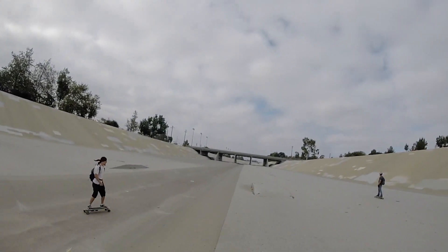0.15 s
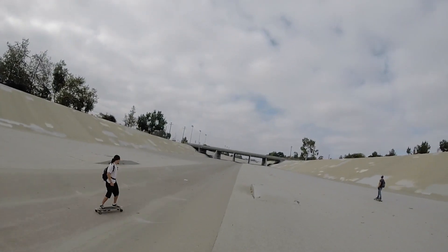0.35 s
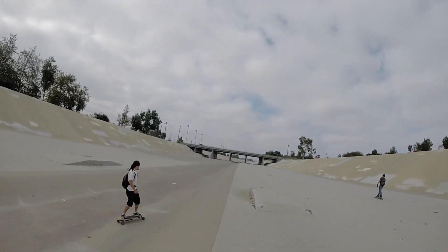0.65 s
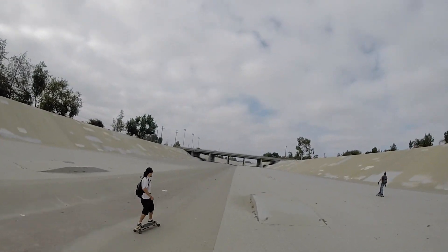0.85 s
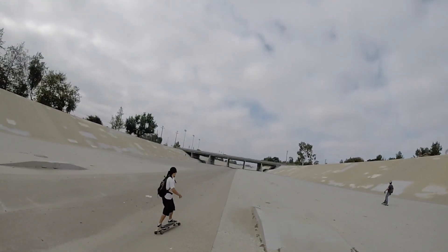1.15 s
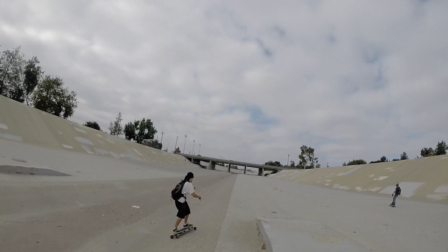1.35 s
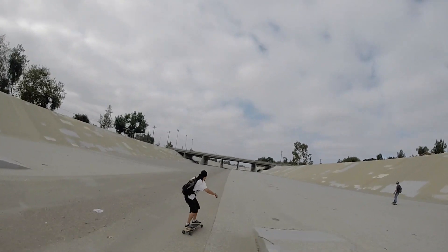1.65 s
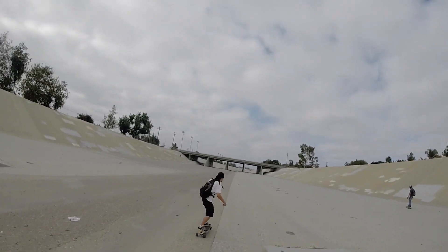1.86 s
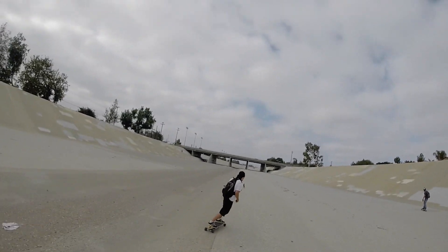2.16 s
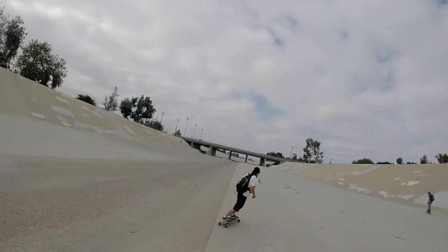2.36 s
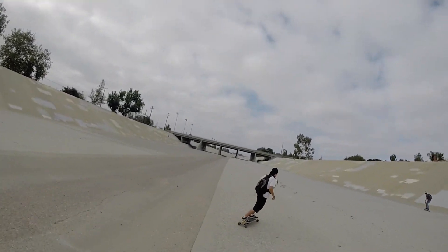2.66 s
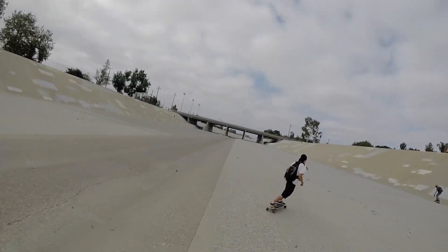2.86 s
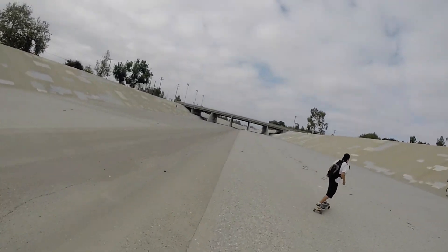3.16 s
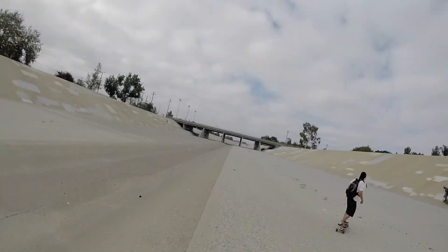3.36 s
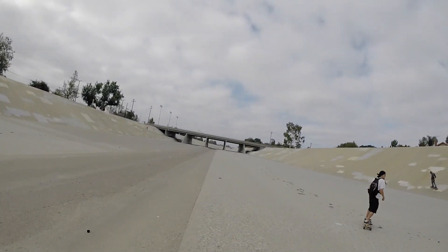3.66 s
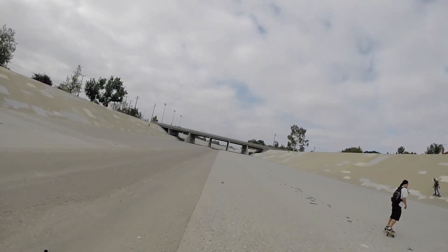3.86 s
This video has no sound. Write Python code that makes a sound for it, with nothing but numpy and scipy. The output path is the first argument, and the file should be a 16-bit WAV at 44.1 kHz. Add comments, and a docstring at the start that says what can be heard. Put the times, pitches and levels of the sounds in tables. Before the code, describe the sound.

Skateboard wheels roll continuously over concrete in an open channel, heard close from a moving board. Until about 2 seconds there is a smooth roar with a low, wavering hum and wind buffeting. Around 2.05 seconds the wheels clack onto harsher ground, with rattle and sandy sizzle. Heavy thumps follow, strongest near 2.7-2.8 seconds, then a faint thin hiss around 3 seconds, and lighter knocks to the end.

```python
"""On the floor of a concrete channel, skateboards roll along, heard from a camera carried on one of them.
Rough ground keeps the camera mount humming (narrow noise) and jolts swing it into dying sine thumps.
Noise impulses ring resonators for decks, trucks and scrape over a smooth roar; decaying bursts clack and tick.
Halfway the boards cross onto a harsher slab and sizzle over sand, then a thin resonant hiss rises in the turn.
Low shaped noise is the wind buffeting the microphone."""
import sys
import numpy as np
from scipy import signal
from scipy.fft import rfft, irfft
from scipy.io import wavfile
from scipy.ndimage import uniform_filter1d

SR = 44100
rng = np.random.default_rng(int(sys.argv[2]) if len(sys.argv) > 2 else 0)


def digitize_waveform(pressure):
    """Quantize a signal to 16-bit integers and store it at the path in sys.argv[1].

    Rows of a 2-D input are taken as channels; values are limited to [-1, 1].
    """
    field = np.atleast_2d(pressure).T
    bounded = np.clip(field, -1, 1)
    quanta = np.round(bounded * 32767).astype(np.int16)
    wavfile.write(sys.argv[1], SR, quanta)


N = 176400
TIME = np.arange(N) / SR

# Resonances of the gritty scrape, rung by rolling and by loose grit.
# Each row: centre in Hz, width in Hz, relative level in dB.
SCRAPE_MODES = [(4370, 190, -2), (4913, 320, 3.5), (5500, 480, 3), (6700, 350, -7.5), (7320, 200, -11)]


def from_db(db):
    """Decibels to amplitude gain."""
    return 10 ** (np.asarray(db) / 20)


def rms_one(x):
    """Scale to unit power."""
    return x / np.sqrt(np.mean(x ** 2) + 1e-20)


def gain_curve(rows, axis=1):
    """Fade between dB points over time, returned as a gain per sample."""
    rows = np.array(rows)
    return from_db(np.interp(TIME, rows[:, 0], rows[:, axis]))


def coloured(points):
    """Unit-power noise whose spectrum follows dB points joined along log frequency."""
    hz, db = np.transpose(points)
    bins = np.maximum(np.arange(N // 2 + 1) * SR / N, 1)
    colour = from_db(np.interp(np.log(bins), np.log(hz), db))
    return rms_one(irfft(rfft(rng.standard_normal(N)) * colour, N))


def drift(rate_hz):
    """Random wander of unit power: noise through two equal low-pass poles."""
    r = np.exp(-2 * np.pi * rate_hz / SR)
    wander = signal.lfilter([1], [1, -2 * r, r * r], rng.standard_normal(N + SR))
    return rms_one(wander[SR:])  # the filter settles during the first second


def resonate(x, hz, width_hz):
    """A steep-sided resonance that keeps the power of white noise."""
    edges = np.clip([hz - width_hz / 2, hz + width_hz / 2], 10, .45 * SR)
    band = signal.butter(2, edges, "band", fs=SR, output="sos")
    return signal.sosfilt(band, x + 1e-18) * np.sqrt(SR / 2 / width_hz)


def body(x, modes):
    """Ring parallel two-pole resonances, then cut steeply outside their range."""
    out = 0
    for hz, width_hz, db in modes:
        r = np.exp(-np.pi * width_hz / SR)
        poles = [1, -2 * r * np.cos(2 * np.pi * hz / SR), r * r]
        ring = signal.lfilter([1, 0, -1], poles, x + 1e-18)
        out = out + from_db(db) * np.sqrt((1 - r * r) / 2) * ring
    lowest_hz, lowest_width_hz, _ = modes[0]
    highest_hz = modes[-1][0]
    edges = np.clip([lowest_hz * .85 - lowest_width_hz / 2, highest_hz * 0.98], 10, .45 * SR)
    out = signal.sosfilt(signal.butter(4, edges, "band", fs=SR, output="sos"), out)
    return out / np.sqrt(sum(from_db(db) ** 2 for _, _, db in modes))


def grains(per_s, spread_db):
    """Tiny random impacts of the wheels on the concrete's grain, at unit power."""
    sizes = from_db(spread_db * np.minimum(rng.exponential(1, N), 6))
    signs = rng.choice([-1, 1], N)
    hits = rng.random(N) < per_s / SR
    return rms_one(sizes * signs * hits)


def bursts(rows, decay_s):
    """Each contact starts a crunch of noise that dies exponentially."""
    level = 0
    for start_s, db in rows:
        fade = np.exp(-np.minimum(np.abs(TIME - start_s) / decay_s, 20))
        level = level + from_db(db) * (TIME >= start_s) * fade
    return level * rng.standard_normal(N)


def swell(at_s, spread_s):
    """A bell-shaped rise and fall."""
    return np.exp(-.5 * ((TIME - at_s) / spread_s) ** 2)


def mount_rumble():
    """The ground keeps the camera mount humming at its resonance, with a fairly even swing."""
    # Shaking of the camera mount. Each row: time in seconds, relative level in dB.
    shake = [(0, -26), (.2, -26), (.36, -36.5), (.45, -24.5), (.53, -21.5), (.6, -39), (.8, -29),
             (1.0, -32.5), (1.28, -24), (1.45, -35), (1.7, -24), (1.93, -29), (2.1, -26), (2.38, -29),
             (2.75, -24), (3.1, -30.5), (3.4, -27.5), (3.75, -25), (4, -24.5)]
    hum = resonate(rng.standard_normal(N + SR), hz=76.3, width_hz=23.4)
    # dividing by the running level evens out the swing
    hum = hum / np.sqrt(uniform_filter1d(hum ** 2, size=4000) + 1e-3)
    return from_db(-0.5) * gain_curve(shake) * hum[SR:]


def wheels():
    """Grain and joints ring deck, trucks and scrape, juddering together over a smooth roar."""
    # Rolling effort. Each row: time in seconds, deck drone in relative dB, truck rattle in relative dB.
    rolling = [(0.0, -39.5, -52), (0.84, -42.5, -59), (1.83, -39, -49), (2.06, -33.5, -43),
               (2.14, -39, -44.5), (2.18, -32.5, -40.5), (2.39, -39.5, -47), (2.56, -36, -43.5),
               (2.59, -39.5, -48), (2.91, -36, -41.5), (2.94, -39, -44.5), (3.09, -38, -48.5),
               (3.29, -41.5, -49), (3.39, -36, -44), (3.48, -39.5, -47), (3.57, -36, -44.5),
               (3.71, -37, -43.5), (3.98, -37.5, -46.5)]
    # Harshness of the surface under the wheels. Each row: time in seconds, relative level in dB.
    harshness = [(0, -64), (1.3, -70.5), (1.7, -61), (2.08, -56), (2.4, -58.5), (2.7, -56.5), (2.92, -55.5),
                 (3.2, -57.5), (3.55, -57.5), (3.97, -59.5)]
    # Wheels clack over joints. Each row: start in seconds, relative level in dB.
    clack_hits = [(2.040, -29.5), (2.076, -32), (2.21, -41), (2.512, -46), (2.66, -36.5), (2.757, -31),
                  (2.857, -36.5), (2.879, -28), (2.91, -40), (3.69, -39.5), (3.728, -35)]
    # Short scuffs of a wheel on the slab. Each row: start in seconds, relative level in dB.
    scuff_hits = [(2.665, -50), (2.752, -45), (2.81, -54), (2.921, -44), (3.465, -47.5)]
    # Resonances of the deck. Each row: centre in Hz, width in Hz, relative level in dB.
    deck_modes = [(204, 51, -5.5), (350.3, 36, -2), (420, 76, 1.5), (501, 27, -29), (782, 130, -14)]
    # Resonances of trucks and wheels. Each row: centre in Hz, width in Hz, relative level in dB.
    truck_modes = [(1645, 186, 11), (1960, 240, 1.5), (2420, 130, 0.5), (2560, 230, 5.5),
                   (2780, 140, -19.5), (3090, 81, -1), (3186, 130, -4.5)]
    # Colour of the smooth roar. Each row: frequency in Hz, relative density in dB per Hz.
    roar_colour = [(90, 9.5), (150, 6), (280, 4.5), (650, -6), (850, 0), (1300, -2.5), (1550, -3),
                   (1850, -8), (2600, -4), (3200, -12), (3650, -18.5), (4300, -19.5), (6200, -23),
                   (6700, -21), (7700, -31), (9000, -29), (10000, -34), (13500, -38), (15500, -48)]
    # Strength of the roar. Each row: time in seconds, level in dB before the judder.
    roar_level = [(0, -42), (1.0, -42), (2.1, -45), (2.6, -45.5), (3.2, -46), (3.97, -44.5)]

    judder = drift(rate_hz=68)
    load = from_db(1.66 * judder)
    slab = np.where(TIME > 1.36, 1, from_db(-2))  # the trucks rattle less before 1.36 s
    clacks = bursts(clack_hits, decay_s=0.0038)
    scuffs = bursts(scuff_hits, decay_s=0.0052)

    on_deck = gain_curve(rolling, axis=1) * grains(per_s=5000, spread_db=2)
    on_deck = from_db(-1.5 + 1.5 * judder) * on_deck
    on_trucks = gain_curve(rolling, axis=2) * grains(per_s=5000, spread_db=2)
    on_trucks = from_db(-2) * slab * load * on_trucks
    on_grit = from_db(-1) * load * gain_curve(harshness) * grains(per_s=3000, spread_db=2)

    deck = body(on_deck + from_db(1.5) * clacks, deck_modes)
    trucks = body(on_trucks + clacks, truck_modes)
    scrape = body(on_grit + scuffs, SCRAPE_MODES)
    fizz = from_db(-13.5) * resonate(on_grit, hz=10100, width_hz=4200)  # fine top of the scrape
    roar = from_db(0.96 * judder) * gain_curve(roar_level) * coloured(roar_colour)
    return deck + trucks + scrape + fizz + roar


def wind():
    """Low noise with a moving level buffets the microphone."""
    # Gusts on the microphone. Each row: time in seconds, relative level in dB.
    gusts = [(0, -66), (.15, -34), (.4, -33.5), (.62, -40), (1.0, -35.5), (1.33, -33), (1.5, -39),
             (1.9, -32), (2.4, -36.5), (2.8, -30.5), (3.25, -35.5), (3.55, -34.5), (4, -29.5)]
    # Colour of the buffeting. Each row: frequency in Hz, relative density in dB per Hz.
    wind_colour = [(12, -10), (27, 8), (45, 3.5), (80, -12.5), (130, -23), (250, -18), (800, -67)]
    return from_db(4) * gain_curve(gusts) * coloured(wind_colour)


def grit():
    """Grit snaps under a wheel as dying noise; dense impacts sizzle on the sandy stretch."""
    # Bits of grit snap under a wheel. Each row: start in seconds, relative level in dB.
    ticks = [(.297, -54), (1.73, -51), (1.786, -49), (1.879, -47.5), (1.993, -53), (2.083, -51),
             (2.109, -54), (2.264, -49), (2.357, -59), (2.55, -52), (2.688, -50), (2.81, -51), (2.922, -48),
             (3.15, -51), (3.85, -55), (3.941, -50)]
    # Resonances of the sandy sizzle. Each row: centre in Hz, width in Hz, relative level in dB.
    sand_modes = [(8760, 550, -8.5), (12000, 920, -7.5)]
    snaps = bursts(ticks, decay_s=0.0044)
    sizzle = from_db(-67) * swell(at_s=2.18, spread_s=0.54) * grains(per_s=1200, spread_db=3.0)
    snap_scrape = from_db(-3.5) * body(snaps, SCRAPE_MODES)
    return snap_scrape + body(sizzle + from_db(-3.5) * snaps, sand_modes)


def mount_thumps():
    """Each jolt swings the mount's modes up, quickly at a joint, slowly in a dip, and lets them die."""
    # Joints and dips. Each row: start in seconds, relative peak level in dB, rise constant in seconds.
    bumps = [(2.044, -14, 0.027), (2.159, -8.5, 0.018), (2.282, -14.5, 0.057), (2.445, -11.5, 0.0092),
             (2.495, -11, 0.023), (2.567, -14, 0.034), (2.667, 0, 0.0054), (2.787, -1, 0.006),
             (2.864, -16, 0.013), (2.917, -15, 0.012), (3.026, -12, 0.032), (3.141, -16, 0.034),
             (3.281, -18, .02), (3.498, -9.5, 0.0067), (3.678, -13, .03), (3.863, -13.5, 0.025),
             (3.944, -17, 0.012)]
    # Modes of the mount. Each row: frequency in Hz, relative level in dB, 60 dB decay time in seconds.
    mount_modes = [(71.95, 7, 0.16), (29, -7, 0.13), (120, -12, 0.052)]
    out = np.zeros(N + SR)
    age = np.arange(SR // 2) / SR
    for start_s, db, rise_s in bumps:
        swing = 0
        for k, (hz, level_db, t60_s) in enumerate(mount_modes):
            decay = from_db(level_db - 60 * age / t60_s)
            swing = swing + (-1) ** k * decay * np.sin(2 * np.pi * hz * age)
        swing = swing * (1 - np.exp(-age / rise_s)) ** 2
        start = int(start_s * SR)
        out[start:start + len(age)] += from_db(db - 2.5) * swing / np.abs(swing).max()
    return out[:N]


def carve():
    """Noise through narrow resonances hisses in the turn, with an airy top at its tightest."""
    # Strength of the hiss in the turn. Each row: time in seconds, level in dB.
    carve_level = [(0, -79), (2.2, -70), (2.75, -65), (2.85, -61), (3.15, -63), (3.4, -60.5), (3.55, -69),
                   (4, -65)]
    # Resonances of the hiss. Each row: centre in Hz, width in Hz, relative level in dB.
    hiss_modes = [(6710, 180, 3), (7800, 200, -28)]
    # Resonances of the airy top. Each row: centre in Hz, width in Hz, relative level in dB.
    air_modes = [(12000, 400, 1), (12500, 300, -8), (13750, 500, -5)]
    hiss = gain_curve(carve_level) * body(rng.standard_normal(N), hiss_modes)
    airy_top = swell(at_s=3.06, spread_s=0.14) * body(rng.standard_normal(N), air_modes)
    return hiss + from_db(-71) * airy_top


def scene():
    """Everything sums at the one moving microphone."""
    board = mount_rumble() + mount_thumps() + wheels()
    return (board + wind() + grit() + carve())[None]


def record(dry):
    """A steep low-pass cuts the top, 70 dB down from about 16 kHz."""
    low_pass = signal.cheby2(12, 70, 15100 * 1.06, fs=SR, output="sos")
    return signal.sosfilt(low_pass, dry)


dry = scene()
out = record(dry)
digitize_waveform(out)
```